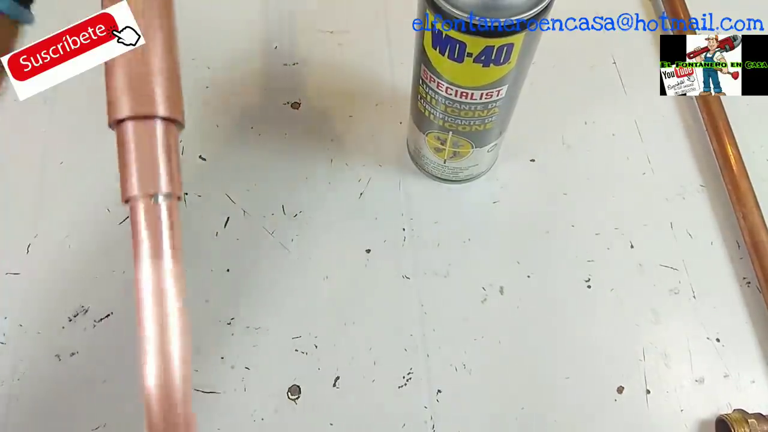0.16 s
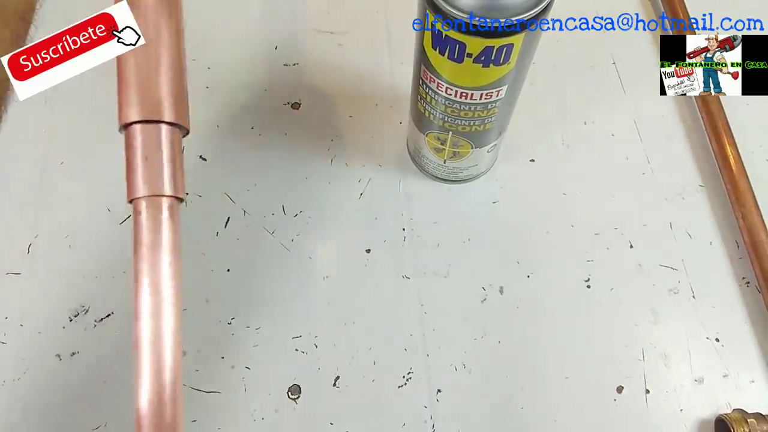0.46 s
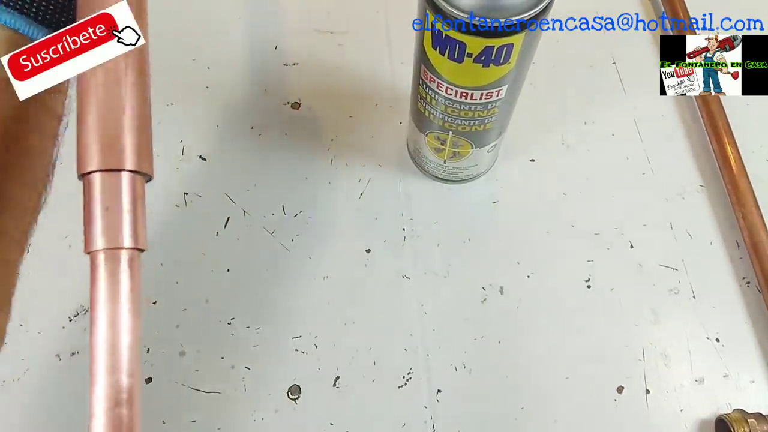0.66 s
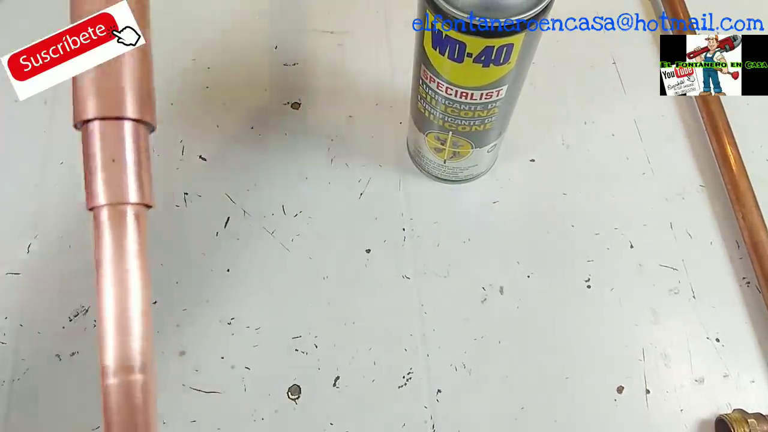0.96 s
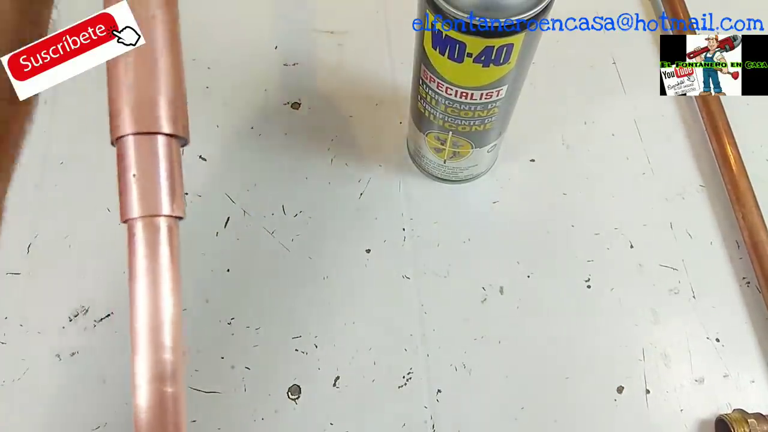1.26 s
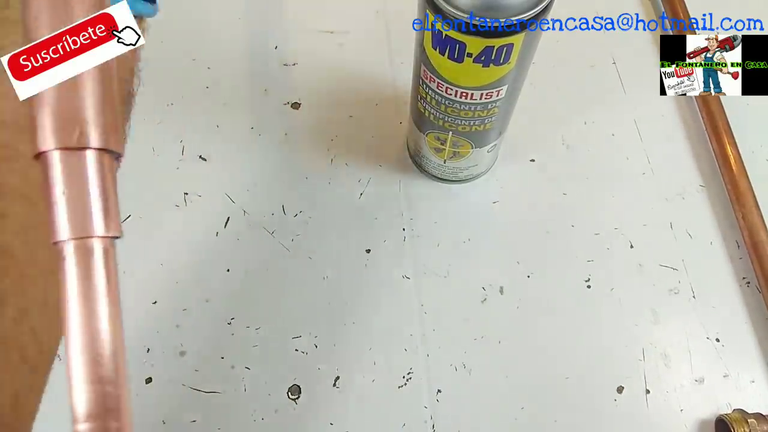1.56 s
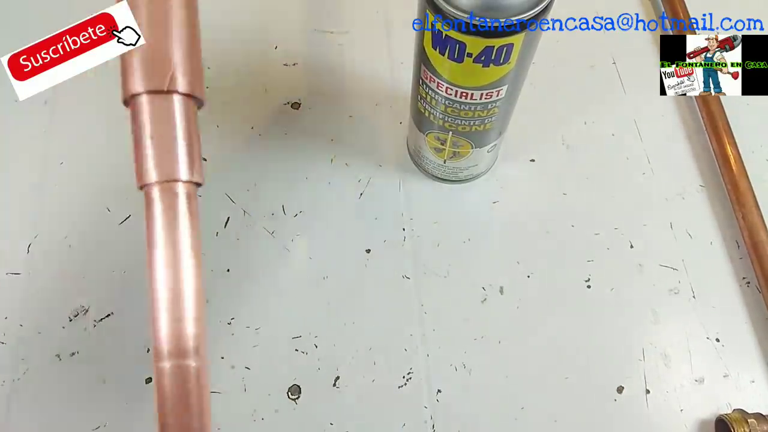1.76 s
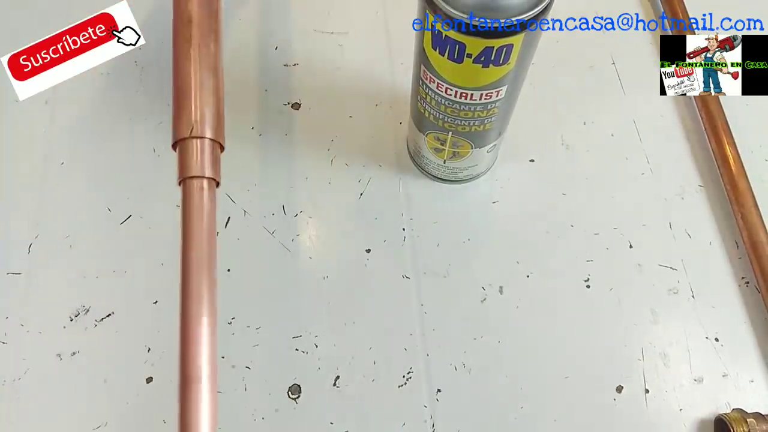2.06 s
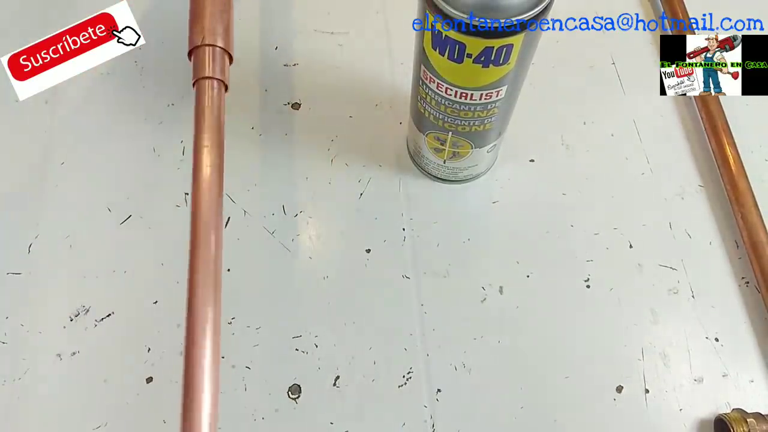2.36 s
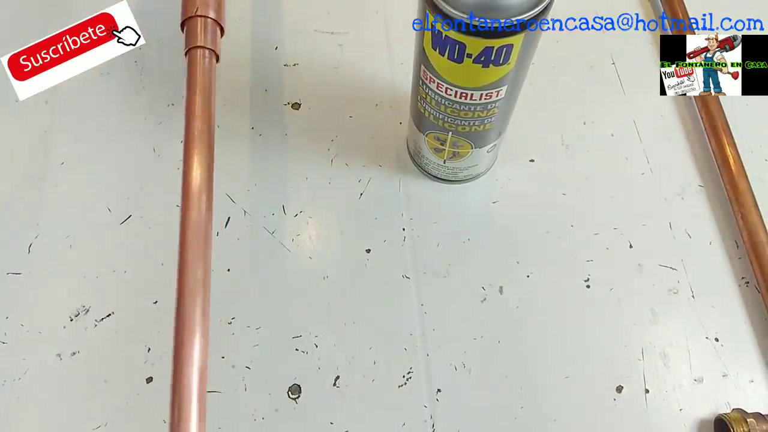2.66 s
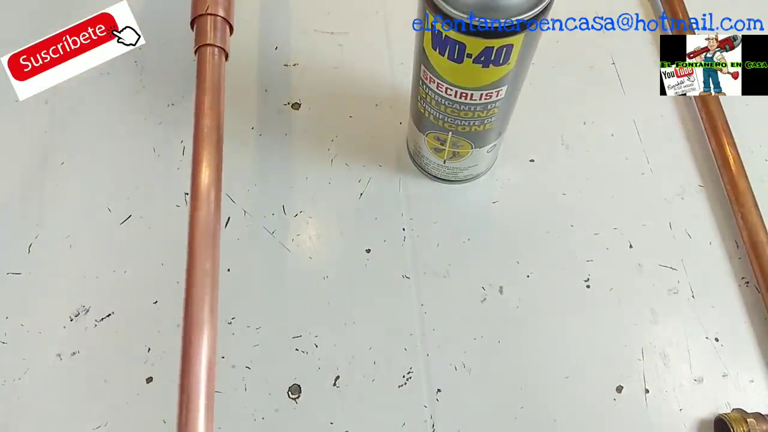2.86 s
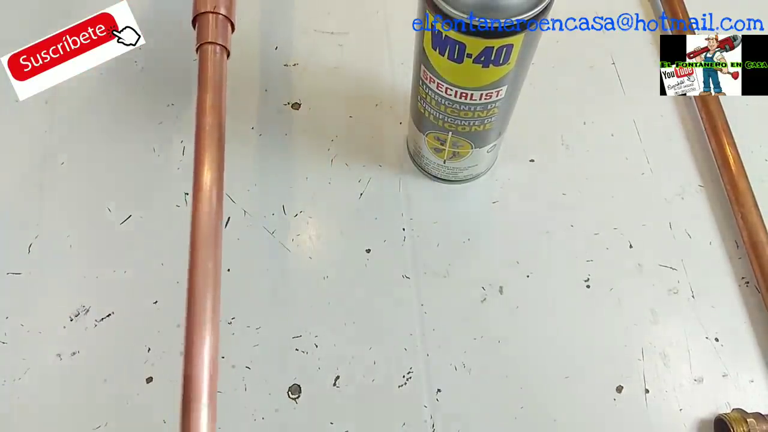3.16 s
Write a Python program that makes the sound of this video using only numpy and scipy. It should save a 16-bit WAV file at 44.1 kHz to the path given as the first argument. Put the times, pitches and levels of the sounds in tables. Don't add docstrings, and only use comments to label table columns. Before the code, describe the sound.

Rubber rings on greased copper hiss brightly in uneven twists from 0 to 1.4 s, with ticks near 0.2 s, thin high squeaks around 0.55-0.8 and 1.1 s, and low dragging scrapes. After a near-pause at 1.5 s, quick jerky rubs resume, slackening after 2.2 s. Dull bench bumps from 2.6 s lead to one hard, ringing copper knock at 3.03 s, a short rattle and small-room tail, then a faint last rub.

```python
import sys
import numpy as np
from scipy import signal
from scipy.fft import rfft, irfft
from scipy.io import wavfile
from scipy.ndimage import uniform_filter1d, map_coordinates

SR = 44100
rng = np.random.default_rng(int(sys.argv[2]) if len(sys.argv) > 2 else 0)


def unload_wav(signal):
    wavfile.write(
        sys.argv[1],
        SR,
        np.round(np.clip(np.atleast_2d(signal).T, -1, 1) * 32767).astype(np.int16),
    )


def volts_from_db(level):
    exponent = np.asarray(level, float) / 20
    return 10 ** exponent


N = 145530
T = np.arange(N) / SR
SIDES = np.array([[.5], [-.5]])
KNOCK_S, LIFT_OFF_S = 3.0346, 3.03

# time in seconds, rubbing level in dB.
TWIST_EFFORT = [
    [(0.0, -57.5), (0.026, -42), (0.076, -40), (0.144, -51), (0.186, -36.5), (0.27, -46), (0.29, -44)],
    [(0.29, -42.5), (0.356, -36.5), (0.462, -42), (0.49, -35), (0.76, -49.5), (0.796, -59), (0.87, -58.5)],
    [(0.87, -53), (0.908, -37.5), (0.998, -46.5), (1.042, -34.5), (1.098, -34), (1.274, -43), (1.5, -73)],
    [(1.5, -90), (1.516, -57.5), (1.57, -72.5), (1.612, -41), (1.7, -36), (1.746, -50), (1.77, -43)],
    [(1.77, -44), (1.784, -38.5), (1.83, -35.5), (1.865, -36), (1.93, -39), (1.988, -44.5), (2.006, -36.5),
     (2.156, -57.5), (2.2, -55)],
    [(2.2, -58.5), (2.316, -43.5), (2.484, -46.5), (2.564, -58), (2.644, -51), (2.748, -61.5), (3.02, -72)],
    [(3.16, -62), (3.176, -59), (3.252, -47), (3.3, -41)],
]
# frequency in Hz, density in dB per Hz.
RUB_SPECTRUM = [(350, -68), (600, -25), (1070, -18), (1960, -13.5), (3780, -7), (5870, -8.5), (11700, -1.5),
                (14900, -8.5), (15600, -1.5)]
# start in seconds, length in seconds, top frequency in Hz,
# sag at the start and sag at the end as fractions of the top, level in dB.
SQUEAKS = [(.605, .1, 9750, .08, .1, -46), (.715, .05, 13000, .01, .09, -50),
           (.64, .03, 12300, .08, .03, -56), (1.085, .03, 13300, .1, 0, -44),
           (.552, .015, 9700, .1, 0, -51), (.8, .05, 7400, .12, .02, -66), (.805, .045, 9700, .1, .03, -66)]
# time in seconds, level in dB.
DRAG_EFFORT = [
    [(0.0, -55), (0.162, -76), (0.216, -54.5), (0.272, -62), (0.326, -50), (0.498, -51), (0.584, -55),
     (0.6, -49.5)],
    [(0.6, -51), (0.656, -47.5), (0.908, -60.5), (1.018, -51.5), (1.03, -47), (1.19, -53.5), (1.256, -52),
     (1.5, -95)],
    [(1.8, -81), (1.854, -65.5), (1.886, -89), (1.932, -60), (2.042, -65.5), (2.06, -50), (2.164, -68),
     (2.58, -71.5)],
    [(2.58, -64), (2.592, -61), (2.668, -54.5), (2.702, -41.5), (2.842, -58.5), (2.858, -67), (2.936, -49),
     (3.02, -55)],
]
# frequency in Hz, width in Hz, level in dB.
DRAG_BODY = [(175, 70, -9), (265, 50, 2), (375, 60, -6), (490, 50, -2), (750, 400, -17)]
# start in seconds, length in seconds, level in dB, centre in Hz.
SCUFFS = [(.183, .022, -48, 1400), (.2, .045, -46, 2200), (.3, .08, -46, 1500), (.64, .05, -55, 1300),
          (1.022, .05, -46, 1200), (1.24, .04, -51, 1600), (1.8, .05, -50, 1800), (1.93, .05, -59, 600),
          (2.02, .06, -54, 1500), (2.591, .012, -44, 800), (2.88, .1, -63, 1700)]
# time in seconds, peak in dB, centre in Hz.
TICKS = [(.1865, -37.5, 1210), (0.2133, -25.5, 1860), (.232, -31.5, 1100), (.4205, -38, 2530),
         (1.786, -26, 6000), (1.858, -28, 8900)]
# time in seconds, peak in dB, contact time in ms.
BUMPS = [(2.056, -31.5, 1.9), (2.593, -39, 0.58), (2.64, -33.5, 3.7), (2.694, -31, 0.85), (2.703, -29, 1.2),
         (2.7189, -26.5, 0.41), (2.76, -31, 0.67), (2.801, -42, 7.9), (2.893, -26, 3.6), (2.937, -25, 3.1)]
# time after the knock in seconds, level relative to it in dB.
REBOUNDS = [
    (-.004, -36),
    (.00165, -1),
    (.0043, -6),
    (.0078, -8.5),
    (0.0104, -7.5),
    (0.0153, -10),
    (0.0232, -14.5),
]
# frequency in Hz, level in dB, T60 in seconds.
BENCH_MODES = [(105.6, -12.5, 0.8), (185, -11, 0.27), (258.2, -5.5, 0.19), (370.4, 1.5, 0.12),
               (486, -38, 0.046), (619, 1.5, 0.034), (810, 10, 0.012), (1080, 4.5, 0.015),
               (1475, 7.5, 0.031)]
# frequency in Hz, level in dB, T60 in seconds.
METAL_MODES = [(500, 7, 0.03), (845, -4, .03), (1120, 1, 0.025), (1320, 3, 0.04), (1421, -9, .12),
               (1465, -5, 0.07), (1580, 1, .04), (1730, -1, .03), (1900, -4, .03), (2444, -9, .12),
               (2560, -3, .05), (2664, -6, 0.04),
               (4020, -8, 0.026), (4495, -10.5, 0.085), (5350, -14.5, 0.066), (6965, -12, 0.07),
              (7990, -7.5, 0.038), (8840, -13, 0.037), (9560, -7, .06), (10170, -17, 0.072),
              (11560, -10, .08), (12070, -12, .06), (13200, -12, .04)]
# frequency in Hz, level in dB, T60 in seconds.
RATTLE = [(288, -27.5, 0.23), (1025, -23.5, 0.08), (1540, -20, 0.059), (2130, -24.5, 0.049),
          (4530, -32.5, .16), (8600, -29.5, .05), (11000, -42, .14)]
# start in seconds, length in seconds, frequency in Hz, level in dB.
GROANS = [(2.62, .08, 1020, -59), (2.79, .065, 185, -50), (2.895, .11, 385, -51), (2.92, .06, 215, -48),
          (2.905, .08, 620, -59), (2.08, .2, 270, -66), (2.26, .1, 255, -67), (2.36, .2, 290, -66),
          (1.53, .1, 720, -70), (2.36, .2, 630, -73), (2.15, .4, 190, -72)]
# start in seconds, level in dB, period in ms.
JOLTS = [
    (2.055, -62, 14),
    (3.036, -43, 16),
]
# frequency in Hz, T60 in seconds.
ROOM_DECAY = [(100, 0.66), (500, 0.28), (2000, 0.36), (5000, 0.26), (10000, 0.046)]
# frequency in Hz, density in dB per Hz.
FLOOR_SPECTRUM = [(30, -15), (150, -8), (400, -20), (624, -5), (911, -12.5), (2610, -6), (11900, -11.5),
                  (14800, -18), (16000, -29)]


def level(x, db):
    return x * volts_from_db(db) / np.sqrt(np.mean(x ** 2))


def colour(x, points):
    f, p = np.arange(N // 2 + 1) * SR / N + 1, np.array(points)
    gain_db = np.interp(np.log(f), np.log(p[:, 0]), p[:, 1])
    return irfft(rfft(x) * volts_from_db(gain_db), N)


def band(x, hz, width):
    return signal.lfilter(*signal.iirpeak(hz, hz / width, SR), x)


def cut(x, hz, kind):
    return signal.sosfilt(signal.butter(3, hz, kind, fs=SR, output="sos"), x)


def walk(rate):
    k = int(SR / rate)
    held = np.repeat(rng.standard_normal(N // k + 1), k)
    return 1.333 * uniform_filter1d(uniform_filter1d(held, k), k)[:N]


def follow(tables):
    p = np.concatenate(tables)
    return volts_from_db(np.interp(T, np.maximum.accumulate(p[:, 0]), p[:, 1]))


def ring(x, modes, damp=1):
    out = 0
    for hz, db, t60 in modes:
        pole = np.exp(2j * np.pi * hz / SR - np.log(1000) / (damp * t60 * SR))
        out = out + volts_from_db(db) * signal.lfilter([1], [1, -pole], x).imag
    return out


def push(s, db, ms):
    u = (T - s) / (ms / 1000)
    shape = np.where((u > 0) & (u < 1), np.sin(np.pi * u), 0)
    return volts_from_db(db) * shape * np.pi / 2 / (ms / 1000 * SR)


def pair(x):
    lag_s = 0.281 / 1000
    late = map_coordinates(x, [(T - lag_s) * SR], order=3)
    return np.array([late, x]) * volts_from_db(-3 * SIDES)


def rings():
    shared = 0.31
    raw = np.sqrt(shared) * pair(rng.standard_normal(N)) + np.sqrt(1 - shared) * rng.standard_normal((2, N))
    raw = swaying_comb(raw) * volts_from_db(1.22 * walk(900))
    raw = colour(raw, RUB_SPECTRUM)
    raw = level(raw + strands(raw), 0)
    effort = follow(TWIST_EFFORT)
    extra_db = 20 * np.log10(effort) + 39
    tilt = 0.1861 * extra_db
    lean = volts_from_db(-0.1074 * extra_db * SIDES)
    out = 0
    for hz in 700 * 1.3 ** np.arange(13):
        treble_left_db = 5 * np.log2(hz / 7000) * SIDES * (hz > 5000)
        gain_db = 1.6 * walk(14.1) + tilt * np.log2(hz / 8000) + treble_left_db
        out = out + band(raw, hz, hz * 0.28) * volts_from_db(gain_db)
    return effort * lean * out


def swaying_comb(x):
    out = []
    for side in x:
        delay_ms = 1.101 + 0.302 * walk(3)
        delayed = map_coordinates(side, [(T - delay_ms / 1000) * SR], order=3)
        out.append(side + volts_from_db(8.5) * delayed)
    return np.array(out)


def strands(x):
    out = 0
    for hz in 2000 + 450 * (np.arange(28) + rng.random(28)):
        out = out + band(x, hz, 51) * volts_from_db(8 * (walk(22.02) - 1))
    return volts_from_db(0.5) * out


def squeaks():
    out = 0
    for s, length, hz, rise, fall, db in SQUEAKS:
        u = np.clip((T - s) / length, 0, 1)
        start_sag = rise * np.clip(1 - 2 * u, 0, 1) ** 2
        end_sag = fall * np.clip(2 * u - 1, 0, 1) ** 2
        f = hz * (1 - start_sag - end_sag + .003 * walk(200))
        env = volts_from_db(db + 2.5 * walk(60)) * np.sin(np.pi * u) ** .25
        out = out + env * np.sin(2 * np.pi * np.cumsum(f) / SR)
    return out


def drag():
    slips_per_s, scatter_db = 1500, 2
    chance, sign, size = rng.random((3, N))
    slips = (chance < slips_per_s / SR) * np.sign(sign - .5) * volts_from_db(-scatter_db * np.log(size))
    body = sum(volts_from_db(db + 2.8 * walk(12.02)) * band(slips, hz, width) for hz, width, db in DRAG_BODY)
    body = level(cut(band(body, 394, 560), 144, "high"), 0)
    fade = volts_from_db(-200 * np.clip(T - LIFT_OFF_S, 0, None))
    return body * follow(DRAG_EFFORT) * fade


def knock():
    contact_ms, knock_db = .1, -19.5
    hard = push(KNOCK_S, knock_db, contact_ms)
    hard = hard + sum(push(KNOCK_S + s, knock_db + db, contact_ms) for s, db in REBOUNDS)
    after = np.clip(T - KNOCK_S, 0, None)
    crack_env = np.clip(after / 0.0011, 0, 1) * volts_from_db(-15 - 60 * after / 0.041)
    crack = crack_env * band(rng.standard_normal(N), 1900, 2600)
    bench = cut(ring(volts_from_db(-6) * hard, BENCH_MODES), 142, "high")
    metal = cut(ring(hard, METAL_MODES) + crack, 333, "high")
    return -bench - cut(metal, 13100, "low")


def rattle():
    after = np.clip(T - KNOCK_S, 0, None)
    out = 0
    for hz, db, t60 in RATTLE:
        noise = band(band(rng.standard_normal(N), hz, 0.41 * hz), hz, 0.41 * hz)
        env = np.clip(after / 0.00063, 0, 1) * volts_from_db(1.6 * walk(400) - 60 * after / t60)
        out = out + env * level(noise, db)
    return out


def bumps():
    soft = sum(push(s, db - 12, ms) for s, db, ms in BUMPS)
    return -cut(ring(soft, BENCH_MODES, damp=.7), 142, "high")


def scuffs():
    out = 0
    for s, length, db, hz in SCUFFS:
        u = (T - s) / length
        env = np.clip(u / 0.069, 0, 1) * np.exp(-np.clip(u - .7, 0, None) / 0.23)
        rough = rng.standard_normal(N) * volts_from_db(3 * walk(300))
        rasp = band(band(rough, hz, 1.7 * hz), hz, 1.7 * hz)
        out = out + env * level(rasp, db)
    return out


def ticks():
    out = 0
    for s, db, hz in TICKS:
        click = -push(s, db, 0.12)
        out = out + band(band(click, hz, hz), hz, hz) * 30000 / hz
    return out


def groans():
    out = 0
    for s, length, hz, db in GROANS:
        env = np.sin(np.pi * np.clip((T - s) / length, 0, 1)) ** .5
        f = hz * (1 + .025 * walk(40))
        out = out + env * volts_from_db(db + 3 * walk(40)) * np.sin(2 * np.pi * np.cumsum(f) / SR)
    return out


def jolts():
    cycles = 0
    for s, db, ms in JOLTS:
        cycles = cycles + volts_from_db(db) * np.sin(2 * np.pi * np.clip((T - s) / ms * 1000, 0, 1))
    return cycles * np.array([[.5], [1]])


def room(x):
    t, tail = T[:SR // 2], 0
    for hz, t60 in ROOM_DECAY:
        a, b = rng.standard_normal((2, len(t)))
        wide = min(hz / 716, 1) * np.array([[1], [-1]])
        tail = tail + band(a + wide * b, hz, 1.23 * hz) / np.sqrt(t60) * volts_from_db(-60 * t / t60)
    tail = cut(tail * np.clip(t / 0.00096, 0, 1), 81, "high")
    tail = tail / np.sqrt(np.sum(tail ** 2) / 2)
    return signal.fftconvolve(x[None], tail, axes=1)[:, :N] * volts_from_db(-4)


def floor():
    a, b = rng.standard_normal((2, N))
    noise = colour(np.array([a + 0.89 * b, a - b]), FLOOR_SPECTRUM)
    return level(noise, -61.5) * volts_from_db(walk(7.94))


def scene():
    solid = drag() + knock() + rattle() + bumps() + scuffs() + ticks() + groans()
    direct = pair(solid) * volts_from_db(0.5 * (T > LIFT_OFF_S) * SIDES)
    return rings() + squeaks() + direct + jolts() + room(solid) + floor()


def low_pass(x):
    return signal.sosfilt(signal.butter(12, 16280, fs=SR, output="sos"), x)


def record(dry):
    top_cut = signal.ellip(10, .2, 90, 15580, fs=SR, output="sos")
    mix = signal.sosfilt(top_cut, dry)
    return low_pass(mix)


dry = scene()
out = record(dry)
unload_wav(out)
```